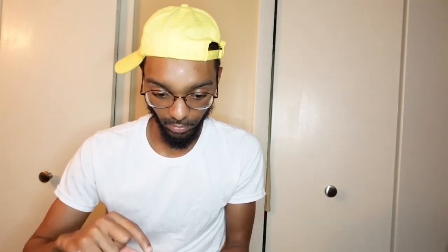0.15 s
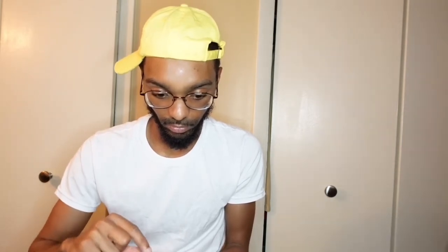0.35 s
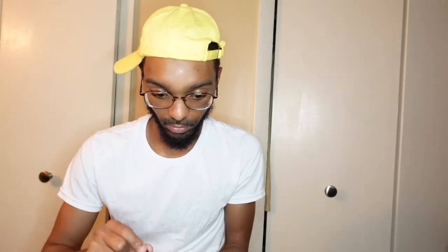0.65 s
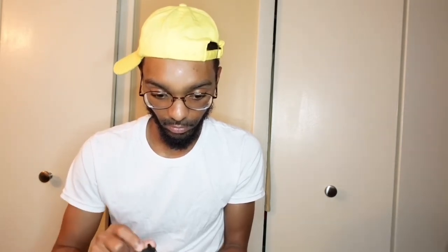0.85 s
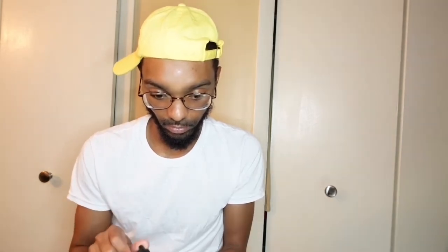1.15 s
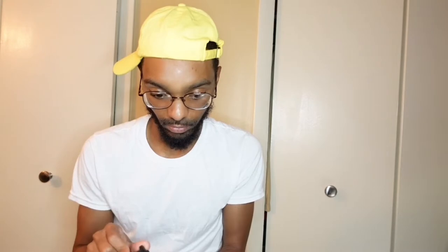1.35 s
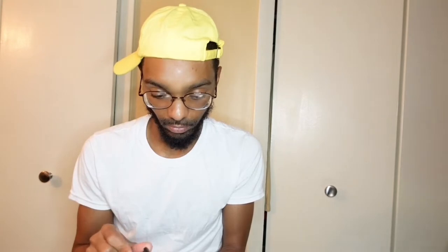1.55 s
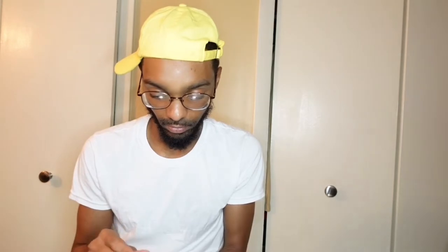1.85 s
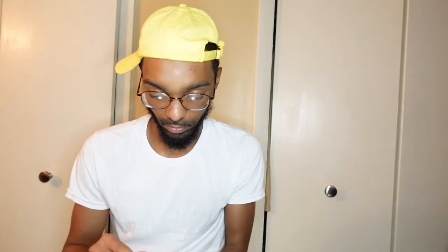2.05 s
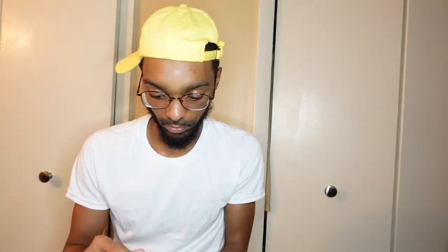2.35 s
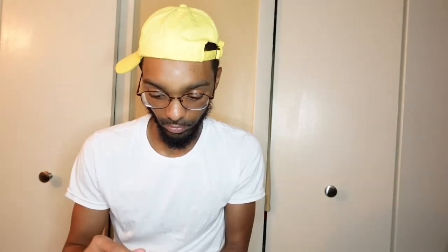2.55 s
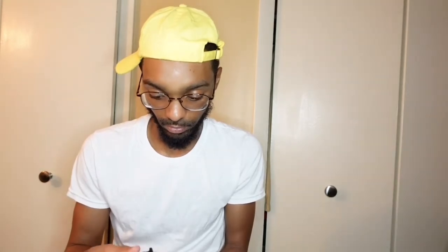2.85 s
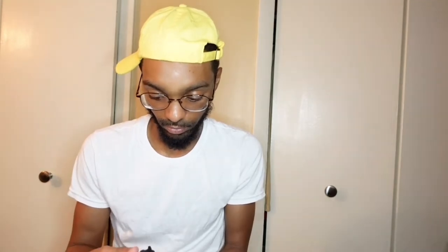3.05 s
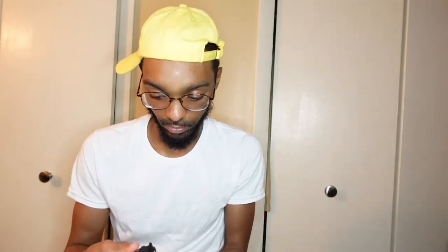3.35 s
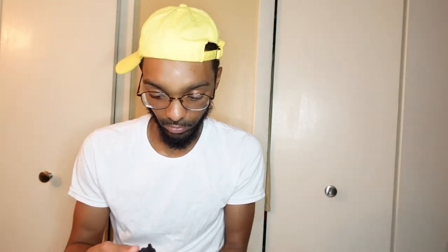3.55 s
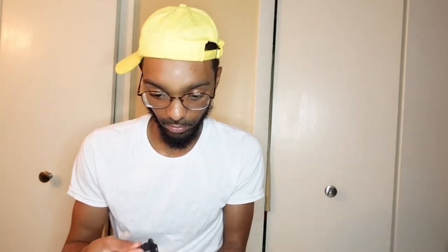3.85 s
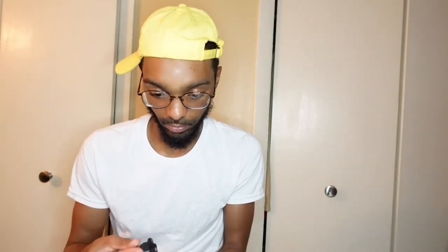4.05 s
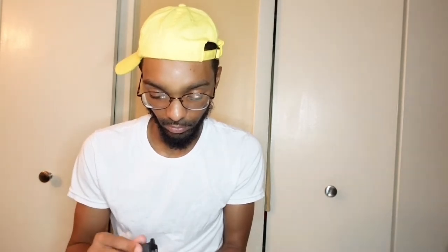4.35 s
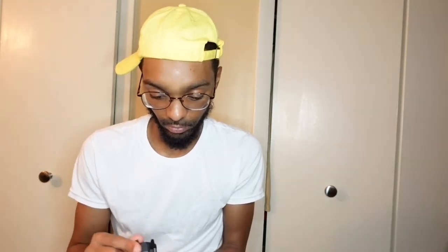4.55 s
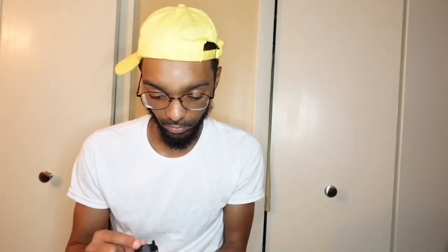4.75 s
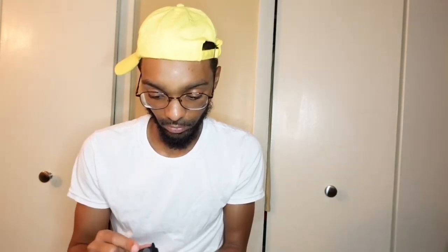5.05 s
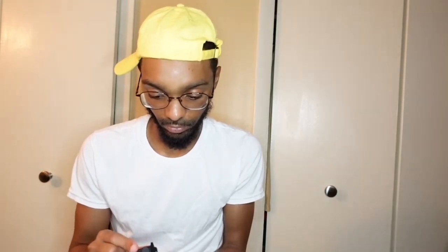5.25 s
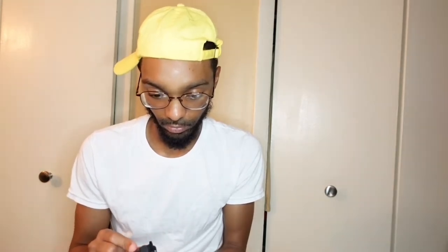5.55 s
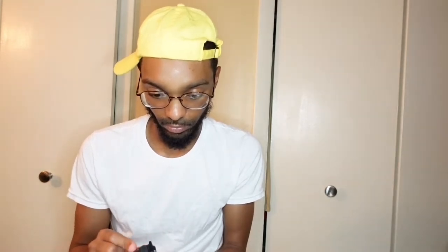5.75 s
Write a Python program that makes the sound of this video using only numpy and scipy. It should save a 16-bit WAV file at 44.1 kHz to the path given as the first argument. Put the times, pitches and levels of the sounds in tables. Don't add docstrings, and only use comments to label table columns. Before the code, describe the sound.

A small torch button snaps four times at uneven intervals, crisp and bright, over faint hiss and very low distant hum.

```python
import sys
import numpy as np
from scipy import signal
from scipy.fft import irfft
from scipy.io import wavfile
from scipy.ndimage import uniform_filter1d

SR = 44100
rng = np.random.default_rng(int(sys.argv[2]) if len(sys.argv) > 2 else 0)


def materialize(psi):
    bounded = np.clip(np.atleast_2d(psi).T, -1, 1)
    quanta = np.round(bounded * 32767).astype(np.int16)
    wavfile.write(sys.argv[1], SR, quanta)


def makeup_ratio(level_db):
    decades = np.asarray(level_db, float) / 20
    return 10 ** decades


N = 260137

# start in seconds, level in dB, room level in dB, left over right in dB,
# delay in seconds until the stereo band narrows.
SNAPS = [
    (1.0934, -19, -3, 1.7, 0.021),
    (2.086, -10.5, -3, 1, 0.028),
    (3.6807, -12, -3.5, 2, 0.051),
    (4.4407, -12.5, -0.5, 1.3, 0.022),
]
# start in seconds, level in dB, index of the snap it sounds like.
TICKS = [
    (2.003, -60, 1),
    (2.054, -49.5, 1),
    (3.5435, -56.5, 0),
    (4.4131, -41, 3),
]
# frequency in Hz, width in Hz, level in dB in each of the 4 snaps.
CASING_MODES = [(610, 98, -35, -34.5, -8, -40), (1650, 190, -14, -14, -13.5, -20),
                (2240, 226, -10.5, -17, -11, -20), (3310, 540, -8, -16, -16.5, -14),
                (4110, 540, -10.5, -13, -8.5, -13), (4840, 450, -4, -5.5, -5, -8.5),
                (6140, 400, -7.5, -0.5, -3, -2), (6936, 710, -6.5, -7.5, -0.5, -2),
                (7520, 384, 0, -3, -5.5, -3.5), (7993, 380, -1, 1, -13, 2.5),
                (8420, 600, -3.5, -7, -2.5, -4.5), (9400, 590, -10.5, -3.5, -10, -3.5),
                (10370, 670, -10.5, -7.5, -12, -6.5), (11540, 770, -11.5, -12, -12, -13),
                (12450, 950, -10.5, -7, -15.5, -7.5), (14010, 880, -24, -8.5, -15, -8.5),
                (15110, 760, -19, -9.5, -11, -8.5)]
# delay in seconds, level in dB in each of the 4 snaps.
BOUNCES = [(.00045, -8, -13.5, -8, -9), (.00085, -0.5, 3.5, -3, -5), (.0013, -7, -2, 1, -1),
           (.002, -5, -14.5, -0.5, -8)]
# delay in seconds, level in dB.
WALL_ECHOES = [(.0062, -7.5), (.0082, -13), (.0122, -14), (.0135, -13), (.0195, -12), (.0258, -8.5)]
# frequency in Hz, time to fall 60 dB in seconds.
ROOM_T60 = [(500, 0.38), (1500, 0.42), (3500, 0.34), (6000, 0.31), (9000, 0.28), (15000, .28)]
# frequency in Hz, left-right likeness from 0 to 1.
ROOM_LIKENESS = [(600, 0.73), (1500, 0.65), (4000, 0.9), (15000, .95)]
# frequency in Hz, density in dB per Hz.
AIR_SPECTRUM = [(24, -35.5), (40, -17.5), (75, -13.5), (91, -6.5), (114, -4), (150, -5), (179, -6),
                (309, -6.5), (417, -10.5), (562, -10.5), (1020, -16), (1450, -15.5), (4350, -26.5),
                (15500, -31.5)]
# frequency in Hz, left-right likeness from 0 to 1.
AIR_LIKENESS = [(60, 0.52), (130, 0.68), (300, 0.54), (1400, 0.49), (3100, .55), (7000, 0.55), (15000, .6)]
# start in seconds, hold in seconds, frequency in Hz, level in dB.
SWELLS = [
    (.4, .25, 103, -78.5),
    (1.15, 0.13, 105.5, -69.5),
    (1.7, .1, 96, -76.5),
    (2.95, 0.14, 99.5, -74),
    (3.7, .5, 101.2, -73.5),
    (4.5, 0.53, 103.3, -65.5),
]
# frequency in Hz, level in dB, moment in step in seconds.
MOTOR_TONES = [(58.02, -78, 1.41), (57.2, -82, 1.41), (126.23, -76, 1.2), (121.15, -79, 1.2),
               (116.04, -87, 1.2)]
# frequency in Hz, width in Hz, level in dB.
WHIRR = (125.3, 9, -84)


def evened(x):
    return x / np.sqrt(np.mean(x ** 2) + 1e-20)


def read(points, hz):
    f, value = np.transpose(points)
    return np.interp(np.log(hz + 1), np.log(f + 1), value)


def add(mix, start_s, sound):
    part = mix[:, round(start_s * SR):][:, :sound.shape[1]]
    part += sound[:, :part.shape[1]]


def echoes(rows, size):
    taps = np.zeros(size)
    for delay_s, db in rows:
        taps[round(delay_s * SR)] += makeup_ratio(db)
    return taps


def pair(frames, hz, likeness):
    a, b, c, d = rng.standard_normal((frames, len(hz), 4)).T
    same = np.clip(read(likeness, hz), 0, 1)[:, None]
    common = np.sqrt((1 + same) / 2) * (a + 1j * b)
    apart = np.sqrt((1 - same) / 2) * (c + 1j * d)
    return np.array([common + apart, common - apart])


def switch():
    crack_db, crack_hz, crack_s = -6.5, 7960, 0.00015
    out = np.zeros((2, N))
    walls = echoes(WALL_ECHOES, size=1400)
    snaps = [(s, db, k) for k, (s, db, *_) in enumerate(SNAPS)]
    for start_s, db, k in snaps + TICKS:
        room_db, pan_db = SNAPS[k][2:4]
        ring = snap(k)
        t = np.arange(len(ring)) / SR
        crack = makeup_ratio(crack_db) * np.exp(-t / crack_s) * np.sin(2 * np.pi * crack_hz * t)
        direct = makeup_ratio(db) * (ring + crack)
        add(out, start_s, direct * makeup_ratio([[pan_db / 2], [-pan_db / 2]]))
        off_walls = np.convolve(direct, walls * rng.uniform(0.35, 1, len(walls)))
        add(out, start_s, off_walls[None].repeat(2, axis=0))
        add(out, start_s, makeup_ratio(room_db + 4.5) * np.linalg.norm(direct) * room(k))
    return out


def snap(k):
    t = np.arange(1500) / SR
    ring = np.zeros(len(t))
    for n, (hz, width_hz, *dbs) in enumerate(CASING_MODES):
        decay = width_hz * np.exp(-np.pi * width_hz * t)
        ring += (-1) ** n * makeup_ratio(dbs[k]) * decay * np.sin(2 * np.pi * hz * t)
    blows = echoes([(0, 0.00041)] + [(s, dbs[k]) for s, *dbs in BOUNCES], size=200)
    blows[1:] *= rng.choice([-1., 1.], 199)
    sound = np.convolve(ring, blows)
    return sound / abs(sound).max()


def room(k, gap_s=0.0055, build_s=0.011, leak_db=-14):
    late_db, late_stretch = -16.5, 2.18
    hz = np.fft.rfftfreq(256, 1 / SR)
    t = np.arange(500) * 64 / SR
    fall_db = -60 * t / read(ROOM_T60, hz)[:, None]
    decay = np.hypot(makeup_ratio(fall_db), makeup_ratio(late_db + fall_db / late_stretch))
    z = pair(len(t), hz, ROOM_LIKENESS) * decay
    tail = signal.istft(z * colour(k, hz)[:, None], nperseg=256, noverlap=192)[1]
    s = np.arange(tail.shape[1]) / SR
    leak = makeup_ratio(leak_db) * (s > 0.002)
    build = np.where(s > gap_s, 1 - 0.5 * np.exp(-(s - gap_s) / build_s), leak)
    clumps_db = 2.0 * evened(uniform_filter1d(rng.standard_normal(len(s)), 60)) * np.exp(-s / 0.05)
    tail = tail * build * makeup_ratio(clumps_db)
    return tail / np.linalg.norm(tail[0])


def colour(k, hz):
    spread = 1.02
    power = np.zeros(len(hz))
    for mode_hz, width_hz, *dbs in CASING_MODES:
        power += makeup_ratio(2 * dbs[k]) / (1 + ((hz - mode_hz) / (spread * width_hz)) ** 2) ** 2
    return np.sqrt(power)


def air(level_db=-62.5, patchy_db=1.17):
    frames, hz = N // 512 + 6, np.fft.rfftfreq(2048, 1 / SR)
    z = pair(frames, hz, AIR_LIKENESS)
    noise = rng.standard_normal((frames, len(hz))).T
    patches = evened(uniform_filter1d(uniform_filter1d(noise, 20, 0), 8, 1))
    z = z * makeup_ratio(read(AIR_SPECTRUM, hz)[:, None] + patchy_db * patches)
    return makeup_ratio(level_db) * evened(signal.istft(z, nperseg=2048, noverlap=1536)[1][:, :N])


def drone(rise_s=0.08, fade_db_per_s=6, fade_holds=1.7):
    t, out = np.arange(N) / SR, np.zeros(N)
    for start_s, hold_s, hz, db in SWELLS:
        end_s = start_s + hold_s
        gone_s = end_s + rise_s + fade_holds * hold_s
        shape = np.interp(t, [start_s - rise_s, start_s, end_s, gone_s], [0, 1, 1, 0])
        level_db = db - fade_db_per_s * np.maximum(t - end_s, 0)
        out += np.sqrt(2 * shape) * makeup_ratio(level_db) * np.sin(2 * np.pi * hz * t)
    return out


def motors():
    t = np.arange(N) / SR
    return sum(np.sqrt(2) * makeup_ratio(db) * np.cos(2 * np.pi * hz * (t - step_s))
               for hz, db, step_s in MOTOR_TONES)


def whirr():
    hz, width_hz, db = WHIRR
    f = np.fft.rfftfreq(N, 1 / SR)
    z = rng.standard_normal(len(f)) + 1j * rng.standard_normal(len(f))
    return makeup_ratio(db) * evened(irfft(z * np.exp(-((f - hz) / width_hz) ** 2 * 2), N))


def scene():
    return switch() + air() + drone() + motors() + whirr()


def band_limit(x):
    return signal.sosfilt(signal.butter(12, 16830, fs=SR, output="sos"), x)


def record(dry):
    edge_hz, refill_hz_per_s, narrowest_hz = 7460, 11100, 1220
    low_cut_hz, top_hz = 43, 15780
    mid, side = (dry[0] + dry[1]) / 2, (dry[0] - dry[1]) / 2
    hz, t, z = signal.stft(side, SR, nperseg=1024)
    edge = np.full(len(t), float(edge_hz))
    wander_hz = 900 * rng.standard_normal(len(t) // 4 + 1).repeat(4)[:len(t)]
    for s, *_, wide_s in SNAPS:
        narrow_s = s + wide_s
        refill = narrowest_hz + wander_hz + refill_hz_per_s * (t - narrow_s)
        edge = np.where(t > narrow_s, np.minimum(edge_hz, refill), edge)
        edge[(t > s - 0.012) & (t <= narrow_s)] = SR
    side = signal.istft(z * (hz[:, None] < edge), SR, nperseg=1024)[1][:N]
    low_cut = signal.butter(4, low_cut_hz, 'high', fs=SR, output='sos')
    x = signal.sosfilt(low_cut, [mid + side, mid - side])
    lowpass = signal.firwin(401, top_hz, window=("kaiser", 8), fs=SR)
    low = signal.oaconvolve(x, lowpass[None], "same", axes=1)
    mix = low + makeup_ratio(-24.5) * (x - low)
    return band_limit(mix)


dry = scene()
out = record(dry)
materialize(out)
```